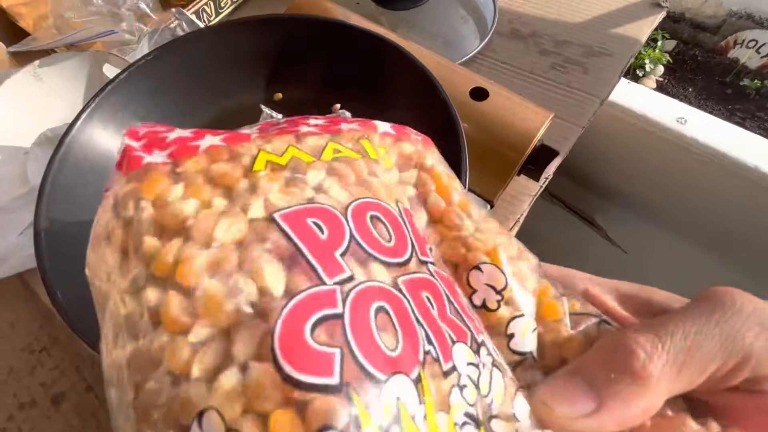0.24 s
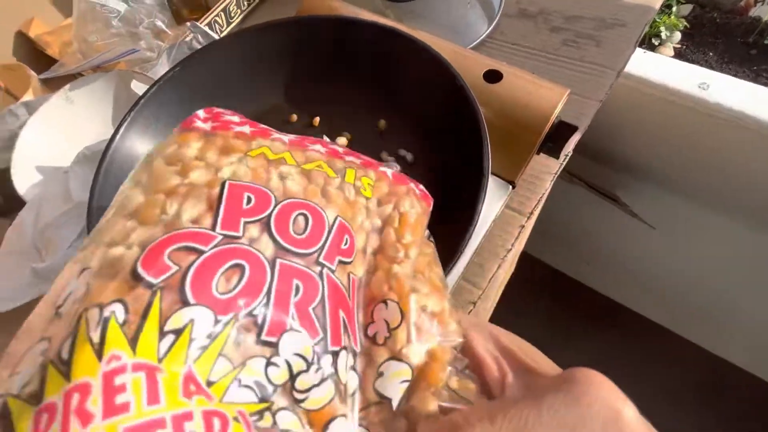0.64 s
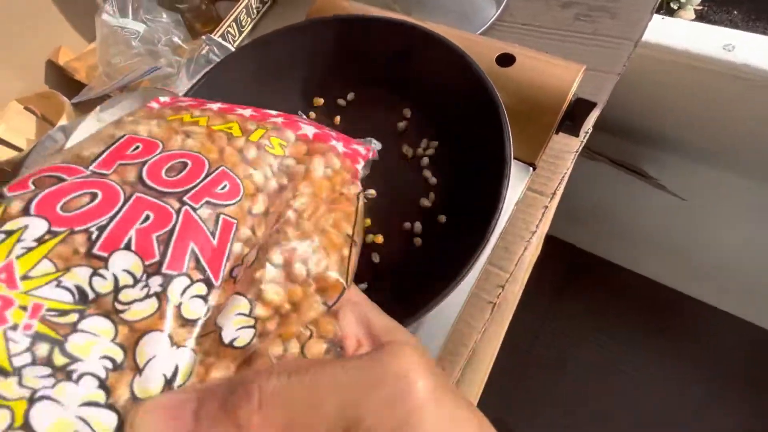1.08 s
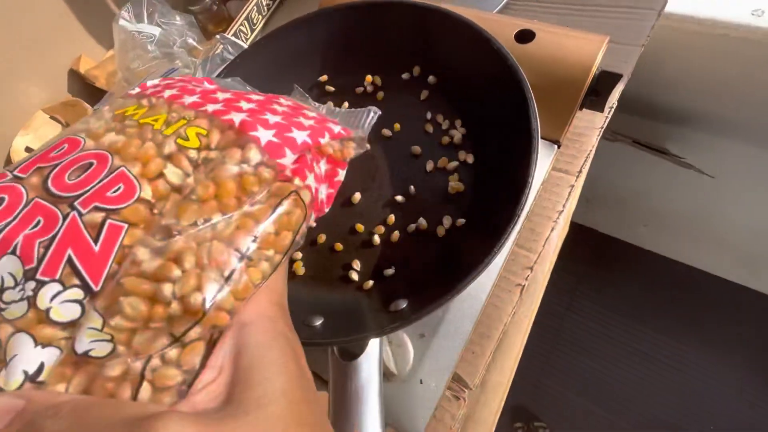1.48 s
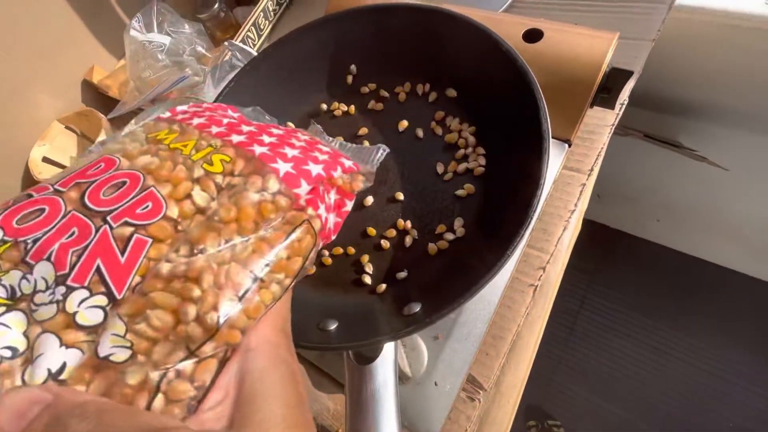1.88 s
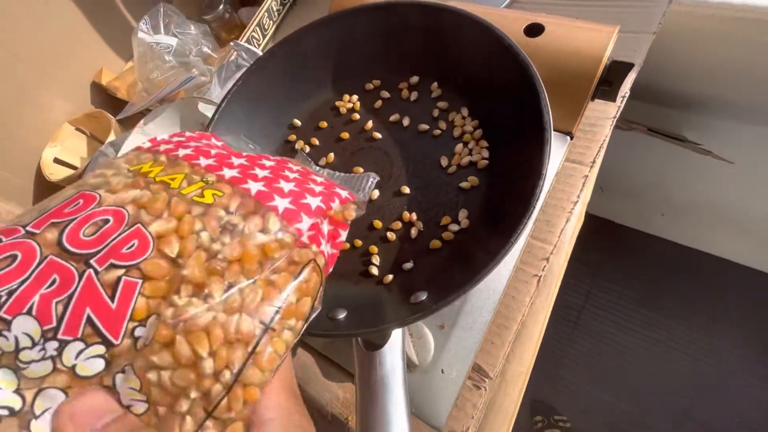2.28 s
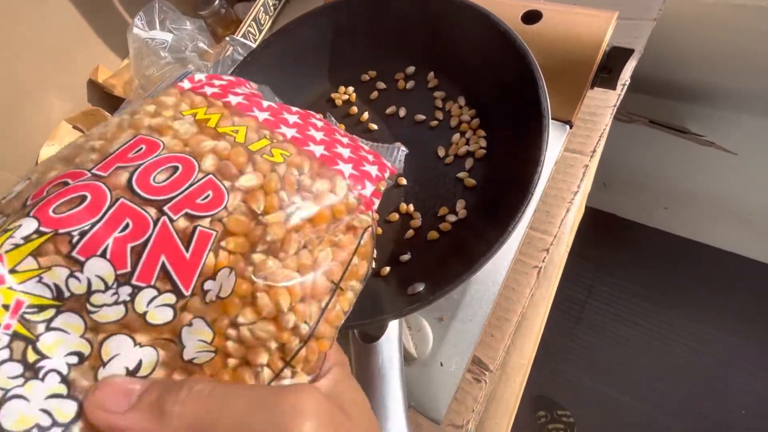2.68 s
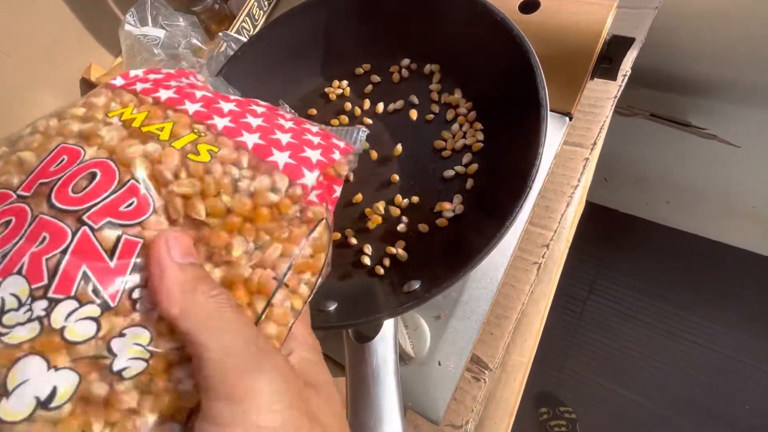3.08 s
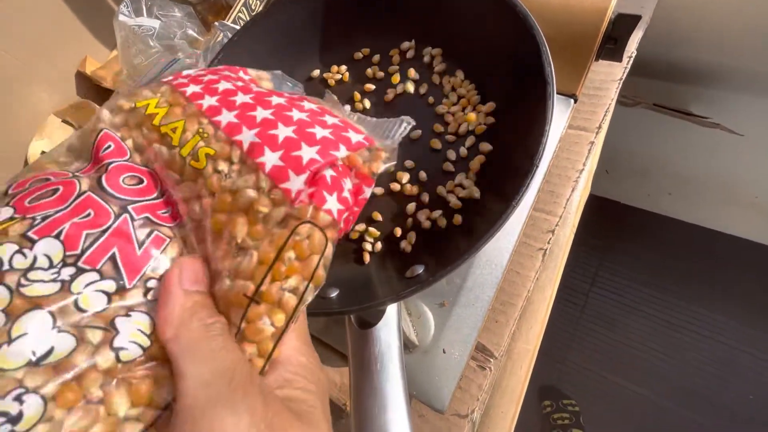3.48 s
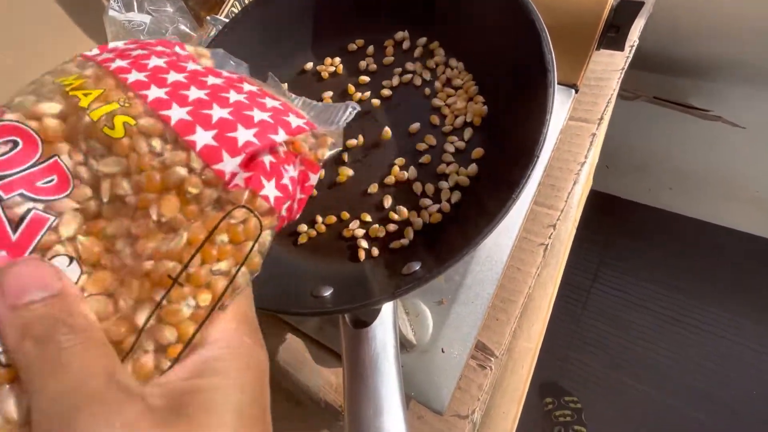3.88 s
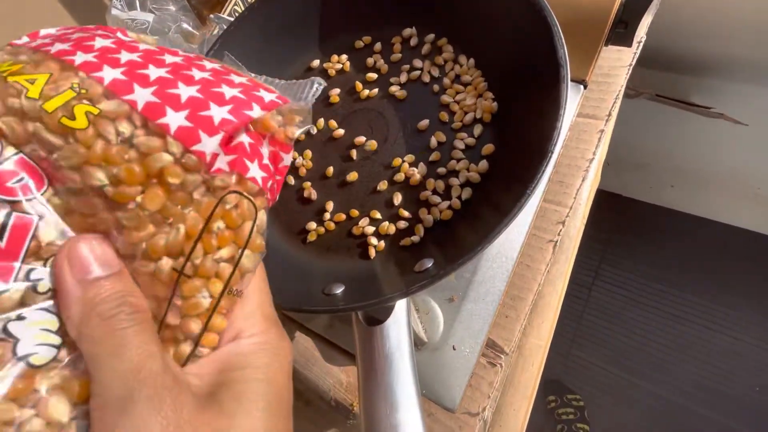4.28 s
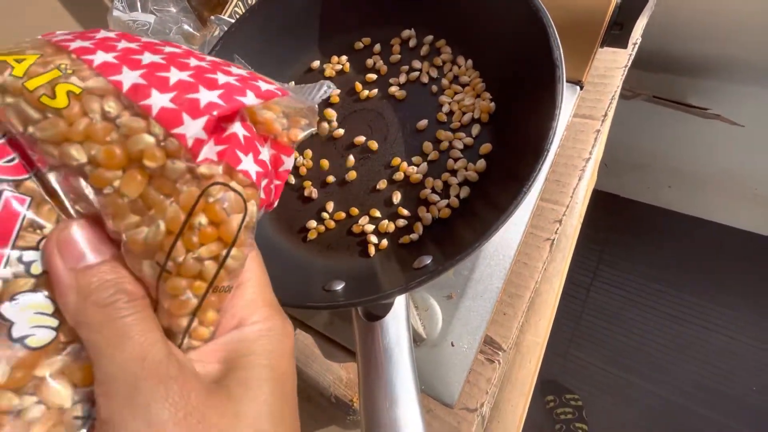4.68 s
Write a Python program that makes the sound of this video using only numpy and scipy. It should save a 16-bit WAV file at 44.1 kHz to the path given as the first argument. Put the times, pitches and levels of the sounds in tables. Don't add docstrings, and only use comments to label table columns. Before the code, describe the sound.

Dry corn kernels tumble from a crackling plastic bag into a thin metal frying pan, pinging and rattling brightly over a faint low hum.

```python
import sys
import numpy as np
from scipy import signal
from scipy.fft import rfft, irfft, next_fast_len
from scipy.io import wavfile
from scipy.ndimage import map_coordinates

SR = 44100
rng = np.random.default_rng(int(sys.argv[2]) if len(sys.argv) > 2 else 0)


def elevation(decibels):
    levels = np.asarray(decibels, float)
    return 10 ** (levels / 20)


def transcribe(signal):
    frames = np.atleast_2d(signal).T
    limited = np.clip(frames, -1, 1)
    pcm = np.round(limited * 32767).astype(np.int16)
    wavfile.write(sys.argv[1], SR, pcm)


N = 218179
CONTACT_S = np.arange(SR // 7) / SR
RISE = (1 - np.exp(-CONTACT_S / 0.0015)) ** 2


def along(points, hz):
    f, v = np.transpose(points)
    return np.interp(np.log(hz + 1), np.log(f + 1), v)


def curves(rows):
    s, *cols = np.transpose(rows)
    return [np.interp(np.arange(N) / SR, s, c) for c in cols]


def unit(x):
    return x / np.sqrt(np.mean(x ** 2) + 1e-20)


def filtered(x, response):
    m = next_fast_len(N + 8192)
    return irfft(rfft(x, m) * response(np.fft.rfftfreq(m, 1 / SR)), m)[..., :N]


def ports(hz):
    # (frequency [Hz], left minus right [dB])
    port_balance = [(80, 4), (250, 2), (700, -7.5), (2400, -0.5), (5500, -14), (9000, -1), (15000, 3)]
    return elevation(np.outer([.5, -.5], along(port_balance, hz)))


def left_right(mid, side):
    return filtered(np.array([mid + side, mid - side]), ports)


def hollow(hz):
    centre_hz, width_hz, depth_db = 2550, 330, -7
    return elevation(depth_db * np.exp(-((hz - centre_hz) / width_hz) ** 2))


def add(track, s, sound):
    start = int(s * SR)
    track[:, start:start + sound.shape[1]] += sound


def pan():
    hits = contacts()
    return ring(hits) + clatter(hits)


def contacts():
    # (time [s],
    # strength [dB], ring of the flat base [dB], lean from the 3.8 to the 3.1 kHz modes [dB])
    landings = [(0.02, -29, -11, -3), (0.0659, -26, -4.5, 3.5), (0.1088, -26, -13, -5),
                (0.1507, -22, -8.5, 4.5), (0.2045, -23.5, -9, 7), (0.2355, -30.5, -25, 19),
                (0.2943, -20.5, -4, 5), (0.3283, -25, -29, -29), (0.3362, -19.5, -23, -1),
                (0.3562, -26, 0, -4), (0.4141, -34.5, 5, -3), (0.455, -31, -7, -13.5),
                (0.4759, -26.5, -7, -1), (0.5168, -33.5, 0, 1), (0.5697, -36, -14, -7),
                (0.5966, -30.5, -5, 4), (0.6984, -25, -3.5, 6), (0.7513, -26, -38, 1),
                (0.7712, -27.5, -1.5, 3), (0.884, -20.5, -37, 10),
                (0.9308, -27.5, -14, 16.5), (0.9499, -19, -3.5, -5), (0.9657, -22, -0.5, 7.5),
              (0.999, -25, -3.5, 8), (1.0591, -25.5, -2, -9), (1.0838, -25.5, -9.5, 10),
              (1.102, -23.5, -1.5, 7.5), (1.1317, -28, -23, 6), (1.1539, -21.5, -12, 10),
              (1.175, -19.5, -41, 7), (1.2085, -25.5, -3.5, -6), (1.2187, -24.5, -12, 19.5),
              (1.2507, -24.5, -4.5, -8), (1.268, -24.5, -0.5, -6.5), (1.2851, -23, -13, 16.5),
              (1.331, -27, -2.5, 0), (1.3669, -30.5, -16, 22), (1.393, -26.5, 0.5, 6.5),
              (1.411, -23.5, -13, 16), (1.5016, -25, -3, -4), (1.5377, -22, -3, -1), (1.5521, -21, -2, -2),
              (1.5749, -25.5, -0.5, -3), (1.5919, -21.5, 0, -6.5), (1.6474, -25, -8, -4),
              (1.663, -23, 2.5, -8), (1.7076, -28, -1, 5.5), (1.7283, -27.5, 0, -8),
              (1.761, -25.5, -5, -12), (1.8565, -23.5, -44, -5),
                (1.9153, -24, -36, 19), (2.2813, -28, 0.5, -3), (2.4208, -31.5, 0.5, 10),
              (2.5901, -30.5, -2.5, -10.5), (2.625, -29, -7, -17.5), (2.644, -29, 0, -6),
              (2.6636, -33, 4.5, -5), (2.754, -25, -16, 19.5), (2.771, -22, -3.5, -9),
              (2.892, -25, -34, -11), (2.9156, -24, 0, -11.5), (2.9229, -21, -15, 9),
              (2.9678, -20.5, -3, 9), (3.031, -25, -5.5, -12), (3.05, -20, -1, 4), (3.075, -22, -1, -6),
              (3.097, -24, 0.5, -1), (3.124, -23, -5, -9), (3.147, -21.5, -5, 7),
                (3.2, -26, -1.5, 6), (3.2162, -23, 0.5, -8.5), (3.2333, -22.5, -1, -4),
               (3.2585, -21.5, -12, 14.5), (3.273, -20.5, -1.5, -3), (3.3003, -18, -7, 12),
               (3.325, -23.5, 1, -5), (3.344, -20, -8, 6), (3.359, -18.5, -1, -5),
               (3.3704, -18.5, -6.5, -9), (3.401, -18, -1, -2), (3.4627, -22.5, -7.5, 0),
               (3.485, -24, -10.5, 13.5), (3.522, -22.5, -21, 13), (3.547, -26, 1.5, -5),
               (3.5804, -21, -13, 11), (3.602, -21.5, -40, 1), (3.6581, -28.5, -3.5, 5),
               (3.691, -25.5, -4.5, 8), (3.753, -32, 5.5, -0.5), (3.7677, -30.5, 0.5, 1), (3.8, -29, -9, 0),
               (3.8291, -23, 0, 1.5), (3.8435, -30, 0, -9), (3.8724, -34.5, 11.5, -3), (3.9044, -28, 1, 1),
               (3.955, -32, 2, -1),
                (4.027, -31.5, 1.5, 1), (4.081, -28, 0, -3), (4.1142, -21, -1, -3),
               (4.203, -23.5, 1.5, -3.5), (4.2284, -25.5, 1, -5.5), (4.286, -33, -1, -7),
               (4.329, -34, 4, 2.5), (4.358, -33, 6.5, -7.5), (4.4466, -26.5, 0, -4),
               (4.486, -28.5, -2, -9), (4.5164, -27, -0.5, -5), (4.5777, -25, -0.5, -8.5),
               (4.613, -26.5, -2, -11), (4.6744, -23, 0.5, -7.5), (4.691, -25.5, 6, -7),
               (4.7274, -28, -2, -1), (4.7542, -27.5, 3.5, -5), (4.7811, -31.5, 8, -8.5),
               (4.8095, -23.5, -0.5, -5), (4.827, -21, 1, 4), (4.843, -22, 1, -6), (4.905, -22, -2.5, -9),
                (.002, -29.5, -1, 1.5), (0.1209, -29, -14, 10), (0.197, -31.5, -0.5, 3),
                  (0.259, -24.5, -10, -8), (0.391, -31.5, -6, -4), (0.5325, -32.5, -6, 4),
                  (0.574, -28, -3.5, 3.5), (.633, -35, -15, -6), (0.649, -30.5, -8, 15), (.81, -32, 1, 1),
                  (0.825, -40, -12, -4), (0.853, -35.5, 1, 0), (.91, -31, -26, -3), (1.028, -28.5, -10, 18),
                  (1.347, -32, -5, 19), (1.457, -29.5, -21, 24), (1.606, -28.5, -1, -4),
                  (1.638, -31, -3, -6), (1.688, -28.5, 1.5, 1), (1.749, -28.5, -3, 4), (1.786, -28, -8, 9),
                  (1.811, -35.5, -1.5, -11), (1.825, -29.5, -12, 9), (1.925, -32, -19.5, 14),
                  (1.977, -34.5, -18, 14), (1.987, -36.5, -10, 0), (2.603, -37, -12, 1),
                  (2.7, -38.5, 2.5, 2), (2.745, -28.5, -3, 3), (2.818, -41, 6, 5), (2.832, -31, -4, 3),
                  (2.884, -41, 6, 2), (2.957, -30.5, 5.5, 3.5), (3.009, -39, 0, -1), (3.421, -28, -12, 14),
                  (3.503, -28, -8, -9), (3.643, -30.5, -42, 8), (3.732, -38, -13, 0),
                  (3.879, -27.5, -8, -5), (4.003, -35.5, -2, 3), (4.051, -37, -13, 0), (4.628, -29, -1, -3),
                  (4.776, -32, 3, -13), (4.788, -24.5, -5, 6), (4.864, -27, 1, -2), (4.886, -33.5, 1, 2)]
    # (time [s], strength [dB], lean from the
    # 3.8 to the 3.1 kHz modes [dB])
    further_landings = [(.449, -41, 11), (.618, -33.5, 2), (.8, -54, 0), (.989, -30, -13.5),
                        (1.014, -27.5, -8.5), (1.043, -30.5, 11), (1.124, -32, -8), (1.196, -33, 15.5),
                        (1.296, -28.5, -7), (1.474, -28.5, 5.5), (1.528, -34.5, 9), (1.72, -35, 12),
                        (1.85, -42, -14), (1.889, -56, 7), (2.055, -42, 8), (2.124, -42.5, 9.5),
                        (2.528, -36, 7), (2.849, -51, 3), (2.908, -42, 14), (3.284, -22, 17), (3.397, -22, 5),
                        (3.435, -26.5, -8), (3.47, -25, 1), (3.539, -27, 4), (3.943, -36, 5), (4.106, -42, 1),
                        (4.268, -58, 10), (4.572, -34, 10), (4.937, -32.5, -4)]
    family_db = [3.5, -4.5, 1.5, 2.5, 2.5, -3, 1]
    on_base = [0, 1, 1, 1, 0, .5, 1]
    on_lean = [0, 0, 1, -1, 0, 0, 0]
    fill_db_per_s = [0.01, 0.07, -0.22, -1, 0.34, 0.7, -2]
    further = np.insert(further_landings, 2, -4.5, axis=1)
    kernels = np.vstack([landings, further])
    hits = []
    for k, (s, blow_db, base_db, lean_db) in enumerate(kernels):
        tilt_db = np.multiply(base_db, on_base) + np.multiply(lean_db, on_lean)
        level_db = blow_db + np.add(family_db, tilt_db + np.multiply(s, fill_db_per_s))
        hop_delay_s = .004 + .008 * rng.random()
        hop_loss_db = -4.5 - 0.2 * s - 8 * rng.random()
        hits.append((k, 0, s, 0, level_db, 0))
        hits.append((k, 1, s, hop_delay_s, level_db, hop_loss_db))
    return hits


def muffle(s):
    return elevation(-60.5 * s * CONTACT_S)


def wavering_modes(hz, family):
    # (frequency [Hz], T60 [s])
    mode_t60 = [(900, 0.14), (3500, 0.096), (12000, 0.032)]
    sag_hz_per_s = [-4.5, -4, -2, -1, -0.5, -11, -1]
    versions, detune = 12, .002
    t = CONTACT_S
    wander = rng.standard_normal((versions, len(hz), len(t)))
    waver = np.cumsum(wander, axis=2) * (.015 + hz[:, None] / 200000)
    moment = np.linspace(0, N / SR, versions)[:, None]
    pitch = hz * (1 + detune * rng.standard_normal((versions, len(hz))))
    pitch = pitch + moment * np.take(sag_hz_per_s, family)
    decay_db = -60 * t / along(mode_t60, hz)[:, None]
    fade = elevation(decay_db) + elevation(-26.5 + decay_db / 5.8)
    modes = np.exp(1j * (2 * np.pi * pitch[..., None] * t + waver)) * fade * RISE
    return modes.astype(np.complex64)


def ring(hits):
    # (frequency [Hz], level [dB], left lead [rad])
    pan_modes = [(900, -7.5, 1.76), (939.6, -6.5, -0.3), (986, -8.5, -1.6), (1060, -12, -1.5),
                 (1876, -0.5, 4), (1912, 0.5, 4), (3128, -2, 1.57), (3520, -16.5, 3), (3715, -11.5, -1.5),
                 (3830, -5, 5), (3990, -13.5, 5), (4765, -3, 10.5), (5884, -3.5, -4.5), (6250, -1, -2.5),
                 (5950, 2, -6.5), (6550, -4, 10.5), (7180, -1.5, -4.5), (6740, -10, -16), (7520, -15, -4),
                 (8460, -0.5, 2), (9200, 2.5, 3.5), (9600, -6.5, 1), (10570, -21, 5), (11390, -15, 0.4),
                 (11300, -14.5, 1), (11300, -21, -2.4), (12060, -12, 0.7), (12100, -19, 1),
                 (13100, -17, -1), (13880, -27, 0), (14000, -15, 3.5), (14400, -27, 2.9), (15620, -27, 6)]
    family_border = [1500, 2500, 3400, 4200, 5300, 10000]
    hz, db, lead = np.transpose(pan_modes)
    family = np.array([1, 6, 2, 3, 5, 0, 4])[np.searchsorted(family_border, hz)]
    share = elevation(db) / np.sqrt(np.bincount(family, elevation(2 * db))[family])
    ears = ports(hz) * np.exp(1j * np.outer([.5, -.5], lead))
    ears /= np.sqrt(np.mean(abs(ears) ** 2, axis=0))
    modes = wavering_modes(hz, family)
    out = np.zeros((2, N + SR))
    for k, hop, s, delay_s, level_db, loss_db in hits:
        luck = rng.standard_normal((4, len(hz)))
        strike_db = np.take(level_db, family) + loss_db + 1.67 * luck[0]
        strength = share * elevation(strike_db) * np.exp(3j * luck[1])
        spot = np.exp(1j * np.where(hz > 9000, .3, .7) * luck[2:])
        version = min(int(s * SR / N * len(modes)) + (k + hop) % 2, len(modes) - 1)
        sound = ((ears * spot * strength).astype(np.complex64) @ modes[version]).real
        add(out, s + delay_s, sound * muffle(s))
    return out[:, :N]


def clatter(hits):
    # (frequency [Hz], level [dB])
    clatter_colour = [(700, -20), (1600, -19.5), (2050, -2), (3400, -2.5), (4500, -2), (6200, 1.5),
                      (7900, -3.5), (9000, -2)]
    # (frequency [Hz], level over 9 kHz [dB])
    top_alike = [(8000, 0.5), (10000, -6.5), (11300, -2), (12300, -2.5), (13000, -10.5), (14300, -15),
                 (15600, -8), (16500, -35)]
    # (frequency [Hz], level over 9 kHz [dB])
    top_opposed = [(8000, 2), (10500, 0), (11500, 0), (12400, -14), (13300, -16), (14300, 0), (15700, -3),
                   (16500, -25)]
    t = CONTACT_S
    fade = RISE * (elevation(-4.0 - 60 * t / 0.19) + elevation(8.5 - 60 * t / 0.015))
    burst = np.zeros((2, N + SR))
    for _, _, s, delay_s, level_db, loss_db in hits:
        noise = rng.standard_normal((2, len(t)))
        add(burst, s + delay_s, elevation(level_db[0] + loss_db - 5) * fade * muffle(s) * noise)

    def colour(f):
        top = elevation([along(top_alike, f), along(top_opposed, f)])
        return elevation(along(clatter_colour, f)) * hollow(f) * top

    return left_right(*filtered(burst[:, :N], colour))


def snaps():
    # (time [s], knock [dB], thump [dB], crack [dB])
    fold_snaps = [(0.0489, -40, -29, -40.5), (0.417, -53, -25, -40.5), (0.422, -34, -25.5, -42),
                  (0.435, -32.5, -49, -51), (0.466, -38, -25, -48), (0.486, -38, -45, -36),
                  (0.527, -32, -54, -43), (0.5413, -31.5, -55, -60), (.643, -25.5, -62, -59),
                  (0.654, -23.5, -59, -53), (0.711, -39, -49, -38), (0.7204, -26.5, -36, -64),
                  (0.8925, -51, -28, -36), (0.9145, -31, -54, -58), (.992, -28.5, -51, -42),
                  (1.2678, -29.5, -41, -40), (2.0108, -23, -38, -37), (2.0928, -44, -59, -35.5),
                  (2.1013, -30, -31, -44), (2.156, -50, -61, -48), (2.182, -46.5, -55, -44),
                  (2.19, -41, -58, -59), (2.408, -50, -50, -44),
                  (2.524, -36, -58, -50), (2.5588, -25, -48, -39), (2.5633, -25.5, -43, -44),
                  (2.6694, -39, -20, -34.5), (2.689, -31, -30, -46), (2.696, -32.5, -33, -42.5),
                  (2.8098, -26.5, -26, -40), (2.956, -56, -28, -53), (2.9786, -41, -17.5, -30),
                  (2.99, -23, -18, -38), (2.9965, -45, -19, -34.5), (3.0095, -41, -45, -31),
                  (3.0242, -36, -22, -50), (3.0539, -16.5, -5, -30), (3.131, -25, -27.5, -57),
                  (3.3367, -17.5, -55, -40), (3.3935, -30.5, -31, -38), (3.533, -20.5, -21, -31),
                  (3.741, -31, -41, -62), (3.751, -44, -21.5, -44), (3.775, -32, -47, -36.5),
                  (3.8715, -22, -22.5, -28.5), (4.048, -29, -65, -59), (4.179, -38, -53, -49),
                  (4.159, -40, -55, -45), (4.194, -28, -29, -40), (4.291, -27, -57, -46),
                  (4.3669, -36.5, -44, -46), (4.398, -40, -54, -38), (4.8597, -28, -30, -31),
                  (3.8712, -18, -52, -58), (2.9554, -27.5, -40, -53), (2.887, -33, -30, -62),
                  (0.093, -59, -42, -55), (2.443, -34, -42, -55)]
    fold_hz = [1200, 1140, 1360, 900, 900, 1460, 1280, 1080, 970, 1020, 1060, 1500, 1760, 1020, 1280, 1230,
               1310, 1800, 1180, 1470, 1620, 1120, 1780, 1140, 2650, 1140, 1120, 1560, 2290, 1120, 900,
               1320, 1060, 1130, 1990, 1040, 1060, 1040, 1170, 1480, 1010, 1130, 1250, 1190, 1400, 2220,
               1390, 1690, 1100, 2420, 1150, 1700, 1060, 2250, 730, 1240, 900, 1140]
    out, t = np.zeros((2, N + SR)), np.arange(SR // 40) / SR
    for (s, knock_db, thump_db, crack_db), hz in zip(fold_snaps, fold_hz):
        luck = rng.standard_normal(2)
        knock = elevation(knock_db + 13.0 - 60 * t / 0.0098) * np.sin(2 * np.pi * hz * t)
        knock *= 1 - np.exp(-t / 0.00041)
        thump = elevation(thump_db - 1.1 - 60 * t / 0.019) * np.sin(2 * np.pi * 430 * elevation(luck[0]) * t)
        crack = elevation(crack_db + 20 - 60 * t / 0.013) * (1 - np.exp(-t / 0.0003))
        crack = crack * rng.standard_normal((2, len(t)))
        tear = elevation(-60 * t / .0045) * rng.standard_normal(len(t))
        crack += elevation(crack_db + 6) * unit(tear)
        body = knock + thump
        late = np.roll(body, abs(int(12 * luck[1])))
        add(out, s, np.array([late, body]) * elevation([[-3], [2]]) + crack)
    return filtered(out[:, :N], lambda f: 1 / (1 + (240 / (f + 1)) ** 4) / np.sqrt(1 + (f / 3600) ** 2))


def rustle():
    # (time [s], film rustle [dB], kernel shuffle [dB])
    stir = [(0.0, -54, -47.5), (0.85, -54, -58.5), (1.4, -55, -61), (1.95, -62, -55), (2.22, -56, -50),
            (2.34, -69, -54.5), (2.5, -58.5, -50), (2.72, -51.5, -48), (2.94, -49.5, -42.5),
            (2.97, -49, -43), (3.04, -43.5, -30.5), (3.17, -48.5, -51), (3.86, -59, -48), (4.3, -57, -60),
            (4.95, -47.5, -79)]
    # (frequency [Hz], level [dB])
    film_colour = [(700, -11), (1200, -3), (1650, -4.5), (3500, -3.5), (5500, -8), (9000, -21.5),
                   (16000, -36)]
    shuffle_colour = [(180, -18), (300, -1), (600, -5.5), (1100, -20.5)]
    film_db, shuffle_db = curves(stir)
    film = crackle(rate_hz=900, spread_db=8.0, clumps_hz=39, colour=film_colour)
    shuffle = crackle(rate_hz=290, spread_db=3.0, clumps_hz=17, colour=shuffle_colour)
    return elevation(film_db + 14.0) * film + elevation(shuffle_db) * shuffle


def crackle(rate_hz, spread_db, clumps_hz, colour):
    wander = map_coordinates(rng.standard_normal(N // 500), [np.arange(N) * clumps_hz / SR])
    clump = elevation(3 * np.tanh(wander))
    clicks = (rng.random(N) < rate_hz / SR) * elevation(spread_db * rng.uniform(-2.0, 4.8, N))
    grain = rng.standard_normal((2, 300)) * elevation(-60 * np.arange(300) / SR / 0.014)
    grains = unit(signal.fftconvolve(clicks[None], grain, axes=1)[:, :N])
    bed = grains + .6 * rng.standard_normal((2, N))
    return unit(filtered(clump * bed, lambda f: elevation(along(colour, f)) * hollow(f) * ports(f)))


def hum():
    # (frequency [Hz], level [dB])
    air_colour = [(20, -68), (55, 0.5), (95, -5), (160, -8.5), (350, -9.5), (700, -22), (1700, -23),
                  (7000, -41.5), (12000, -71)]
    # (frequency [Hz], left-right likeness [correlation])
    likeness = [(80, 0.92), (300, .85), (700, 0.3)]

    def mid_side(f):
        turn = np.arccos(np.clip(along(likeness, f), -1, 1)) / 2
        return elevation(along(air_colour, f)) * [np.cos(turn), np.sin(turn)]

    mid, side = filtered(rng.standard_normal((2, N)), mid_side)
    return elevation(-50.0) * unit(left_right(mid, side))


def scene():
    return pan() + snaps() + rustle() + hum()


def low_pass(x):
    return signal.sosfilt(signal.butter(12, 16520, fs=SR, output="sos"), x)


def record(dry):
    soft = dry / (1 + abs(dry / .85) ** 4) ** .25
    mix = filtered(soft, lambda f: np.where(f < 15850, 1, .1))
    return low_pass(mix)


dry = scene()
out = record(dry)
transcribe(out)
```